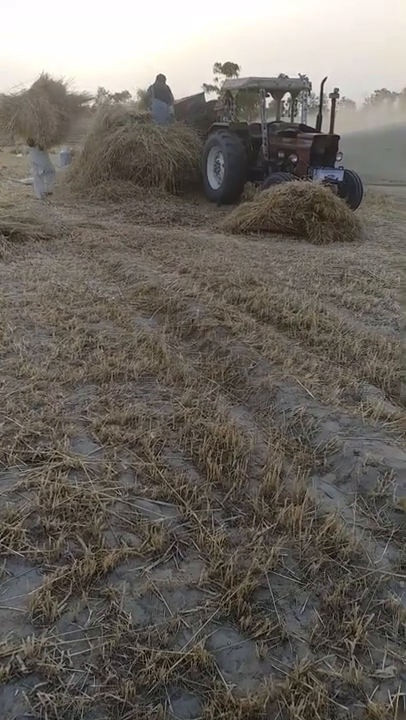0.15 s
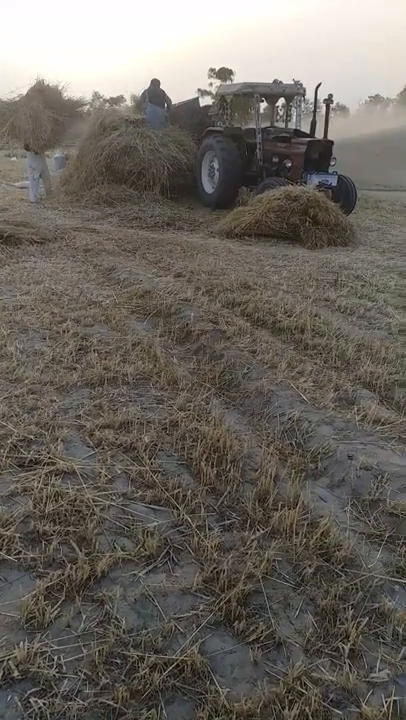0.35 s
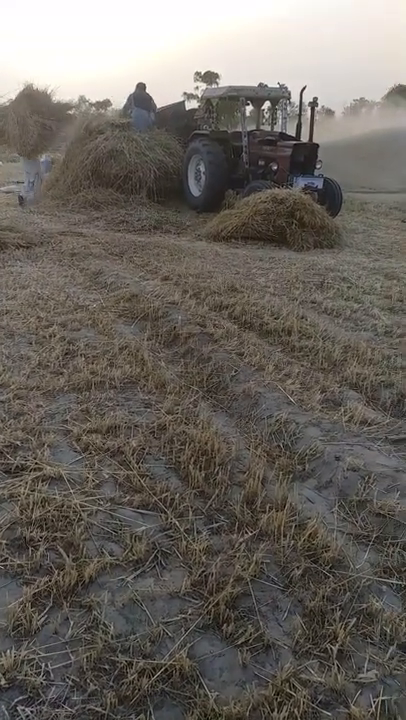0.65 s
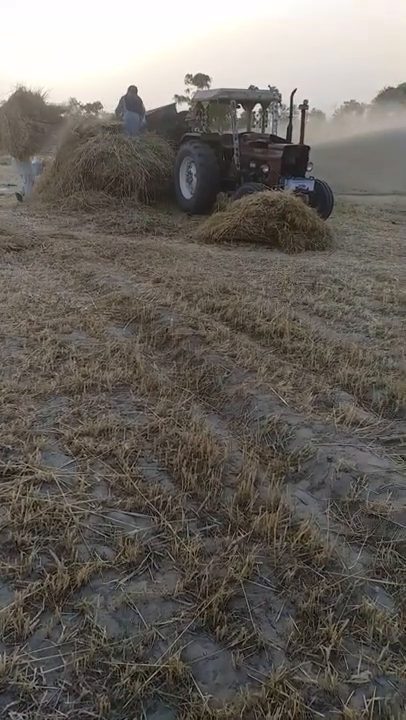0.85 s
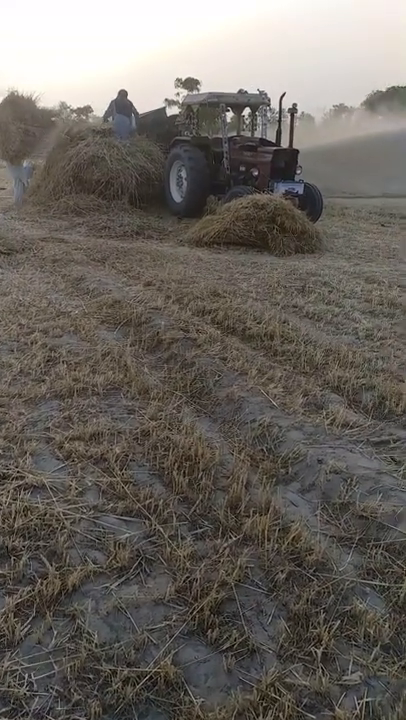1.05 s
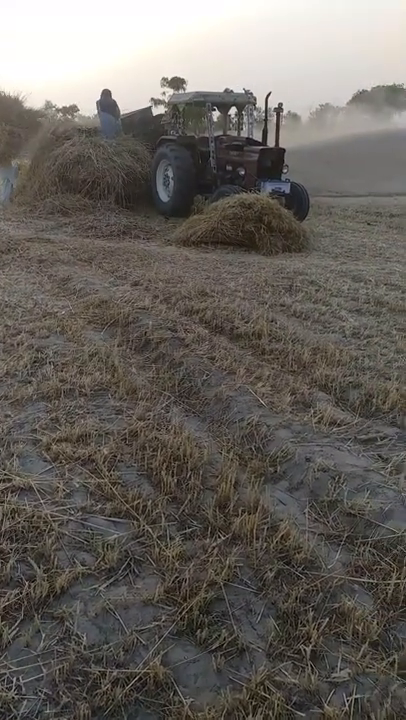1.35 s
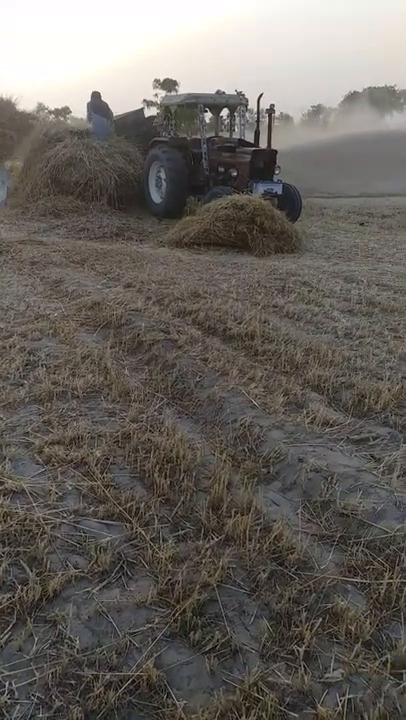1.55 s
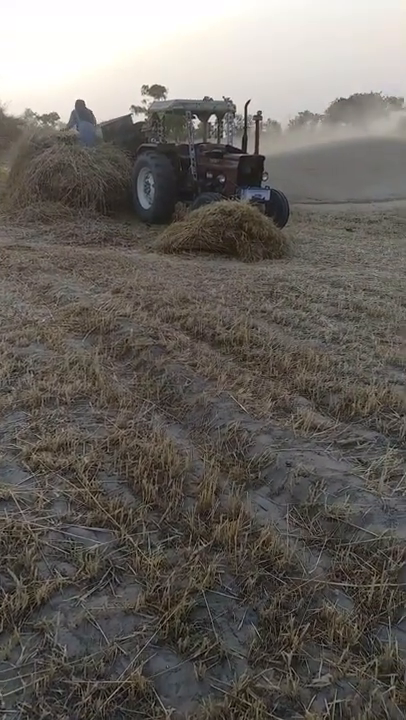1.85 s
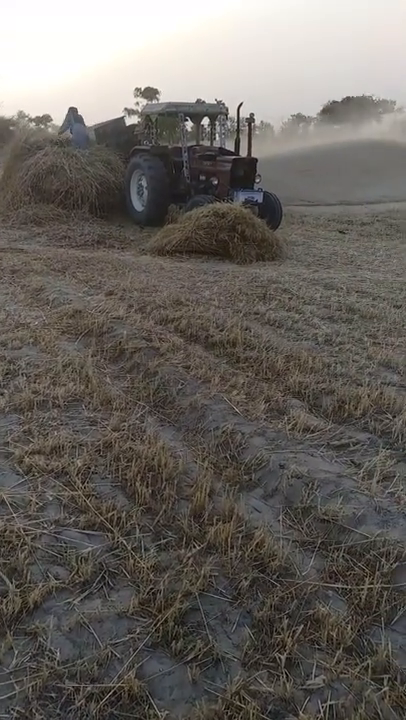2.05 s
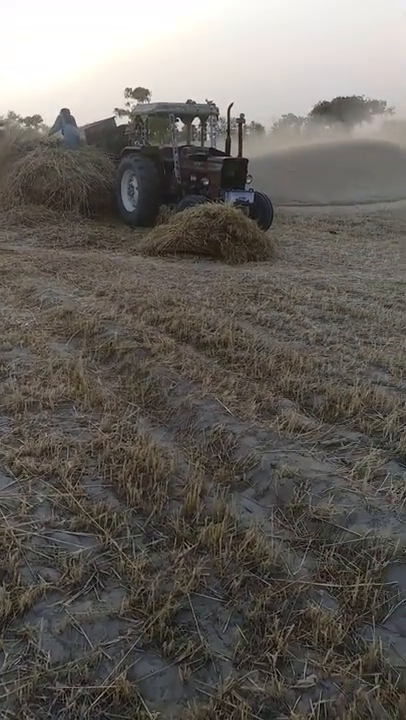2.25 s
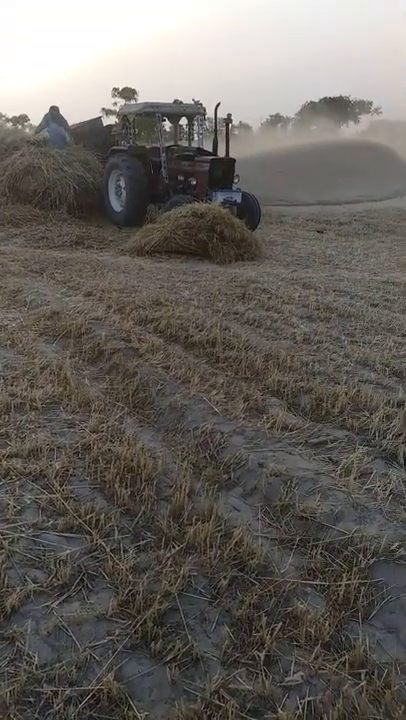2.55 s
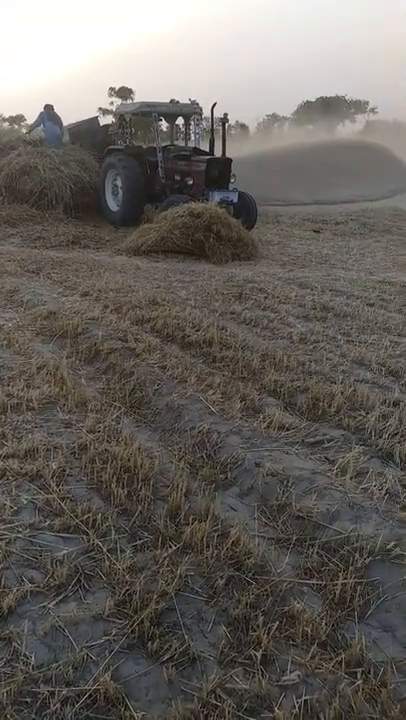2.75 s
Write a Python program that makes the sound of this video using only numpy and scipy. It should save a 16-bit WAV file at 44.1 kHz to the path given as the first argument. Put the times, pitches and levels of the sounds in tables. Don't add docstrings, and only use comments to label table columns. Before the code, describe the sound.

Continuous tractor engine drone and thresher roar, heard from some way off, sagging slightly under load

```python
import sys
import numpy as np
from scipy import signal
from scipy.fft import rfft, irfft
from scipy.io import wavfile
from scipy.ndimage import uniform_filter1d

SR = 44100
rng = np.random.default_rng(int(sys.argv[2]) if len(sys.argv) > 2 else 0)


def master_out(mix):
    frames = np.transpose(np.atleast_2d(mix))
    ceiling = np.clip(frames, -1, 1)
    pcm = np.round(ceiling * 32767).astype(np.int16)
    wavfile.write(sys.argv[1], SR, pcm)


def amplitude_ratio(level_db):
    exponent = np.asarray(level_db, float) / 20
    return 10 ** exponent


N = 128331

# time_s, firing_rate_hz
ENGINE_SPEED = [
    (0, 57.9),
    (.6, 57.9),
    (1.05, 57.7),
    (1.55, 57.35),
    (1.9, 56.95),
    (2.2, 56.05),
    (2.5, 55.8),
    (2.91, 55.75),
]
# time_s, straw_feed_db, diesel_knock_db
WORK_LOAD = [
    (0, -19.5, -4.5),
    (.4, -19.5, 0),
    (.9, -20, -1),
    (1.5, -20, -4.5),
    (1.75, -20.5, -2.5),
    (1.95, -22, -2.5),
    (2.3, -22.5, 3.5),
    (2.6, -21, 0),
    (2.91, -21, 0.5),
]
BLADE_RATIO = .6163


def evened(x):
    return x / np.sqrt(np.mean(x ** 2) + 1e-20)


def read(points, hz):
    f, value = np.transpose(points)
    return np.interp(np.log(hz + 1), np.log(f + 1), value)


def curve(table, column=1):
    rows = np.array(table)
    return np.interp(np.arange(N) / SR, rows[:, 0], rows[:, column])


def wander(hz):
    knots = uniform_filter1d(rng.standard_normal(200), size=2) * np.sqrt(2)
    return np.interp(np.arange(N) / SR * hz, np.arange(200), knots)


def ring(x, modes):
    out = np.zeros(N)
    for hz, width_hz, db in modes:
        radius = np.exp(-np.pi * width_hz / SR)
        angle = 2 * np.pi * hz / SR
        poles = [1, -2 * radius * np.cos(angle), radius * radius]
        out += amplitude_ratio(db) * (1 - radius * radius) / 2 * signal.lfilter([1, 0, -1], poles, x)
    return out


def noise(shape, db, patchy_db, flicker_db):
    frames = N // 256 + 5
    real, imaginary, patch = rng.standard_normal((frames, 513, 3)).T
    patch = uniform_filter1d(patch, size=8, axis=0)
    patch = evened(uniform_filter1d(patch, size=10, axis=1))
    flicker = flicker_db * rng.standard_normal(frames)
    spectra = (real + 1j * imaginary) * amplitude_ratio(patchy_db * patch + flicker)
    white = signal.istft(spectra, nperseg=1024, noverlap=768)[1][:N]
    hz = np.fft.rfftfreq(N, 1 / SR)
    inside = (hz > shape[0][0]) & (hz < shape[-1][0])
    return amplitude_ratio(db) * evened(irfft(rfft(white) * amplitude_ratio(read(shape, hz)) * inside, N))


def firings():
    strong_firing_s = 2.304
    turns = np.cumsum(curve(ENGINE_SPEED)) / SR
    return turns - turns[round(strong_firing_s * SR)] + 400


def sag_hz():
    rate_hz = curve(ENGINE_SPEED)
    return rate_hz.max() - rate_hz


def tones(turns, orders, dbs):
    out = np.zeros(N)
    for order, db in zip(orders, dbs):
        level = np.sqrt(2) * amplitude_ratio(db + 0.9 * wander(hz=3.14))
        out += level * np.sin(2 * np.pi * (order * turns + rng.random()))
    return out


def comb(turns, count, spread_db, shift_db):
    slow = turns[::4]
    wave = np.zeros(len(slow))
    for order in range(4, count):
        level = amplitude_ratio(spread_db * rng.standard_normal() + shift_db * wander(hz=3.5)[::4])
        wave += level * np.sin(2 * np.pi * (order * slow + rng.random()))
    return evened(signal.resample_poly(wave, 4, 1)[:N])


def feed(share):
    level_db = curve(WORK_LOAD)
    return amplitude_ratio(share * (level_db - level_db.mean()))


def blows():
    cylinder_db = [0, -5, -1, -5]
    spread_db, peak_s = 1.5, 0.0018
    turns = firings()
    which = turns.astype(int)
    chance = np.clip(rng.standard_normal(600), -2, 2)[which]
    size_db = np.array(cylinder_db)[which % 4] + spread_db * chance
    since = turns % 1 / curve(ENGINE_SPEED) / peak_s
    return evened(amplitude_ratio(size_db + curve(WORK_LOAD, column=2)) * since * np.exp(-since))


def exhaust():
    exhaust_orders = [1, 2, 2.5, 3, 4]
    exhaust_db = [-31.5, -25, -37, -34, -36]
    return tones(firings(), exhaust_orders, exhaust_db)


def gear_whine():
    fade_db_per_hz = 1.8
    return amplitude_ratio(-fade_db_per_hz * sag_hz()) * tones(firings(), [19.5], [-32])


def blower_hum():
    blower_orders = [4, 5, 6]
    blower_db = [-38, -30, -34]
    fade = amplitude_ratio(-3.5 * sag_hz() ** 2)
    return fade * tones(firings() * BLADE_RATIO, blower_orders, blower_db)


def knock(envelope):
    # pitch_hz, width_hz, level_db
    block_modes = [(1890, 190, 0), (2410, 120, 2), (3240, 99, -1), (3703, 190, 0), (4570, 100, -19.5)]
    ping_hz, ping_db, burst_db = 3760, -50.5, -49.5
    burst = evened(ring(ring(envelope * rng.standard_normal(N), block_modes), block_modes))
    sway_hz = ping_hz * (1 + 0.013 * wander(hz=39.84))
    ping = envelope ** 1.3 * np.sin(2 * np.pi * np.cumsum(sway_hz) / SR)
    return amplitude_ratio(burst_db) * burst + amplitude_ratio(ping_db) * evened(ring(ping, [(ping_hz, 500, 0)]))


def thresher():
    drum_orders = [4, 6, 7, 8, 9, 11, 12, 14, 16, 18, 20, 24]
    drum_db = [-38.5, -28.5, -44.5, -26, -40, -41.5, -27.5, -41.5, -30, -34.5, -43.5, -38]
    # pitch_hz, width_hz, level_db
    housing_modes = [(164.2, 9.7, -9), (281, 15, -9), (393, 17, -10.5), (429.6, 19, -11.5),
                     (521.3, 7.7, -7), (542.6, 25, -0.5), (599, 9.3, -2), (634.3, 8, -2), (849.1, 18.4, 0),
                     (878.4, 14.8, -2.5), (912, 15, -7), (1214, 20, -6), (1282, 27, -5.5)]
    drum_ratio, pulley_ratio, slow_blower_ratio = .1968, 2.226, .1849
    turns = firings()
    hum = tones(turns * drum_ratio, drum_orders, drum_db) + tones(turns, [pulley_ratio], [-28])
    blades = comb(turns * BLADE_RATIO, count=40, spread_db=1.96, shift_db=-1.8)
    slow_blower = comb(turns * slow_blower_ratio, count=64, spread_db=-0.5, shift_db=1.0)
    rattle = rng.standard_normal(N)
    rung = np.zeros(N)
    for shaking, db in [(blades, -28), (slow_blower, -28), (rattle, -23.5)]:
        rung += amplitude_ratio(db) * evened(ring(ring(shaking, housing_modes), housing_modes))
    return hum + feed(1.0) * rung


def straw(envelope):
    # pitch_hz, level_db
    rumble_shape = [(3, -36), (42, -16.5), (100, -6), (150, 0.5), (230, -1), (320, -5), (480, -5),
                    (600, -24)]
    # pitch_hz, level_db
    roar_shape = [(380, -15), (480, -33.5), (530, 4), (900, -3), (1020, -7), (1450, -2.5), (1600, -14.5),
                  (2000, -33)]
    # pitch_hz, level_db
    hiss_shape = [(880, -38), (1500, -5), (1710, -7), (1940, 1.5), (2260, -6.5), (2670, -7), (4760, -18.5),
                  (6660, -29), (8600, -49), (11200, -89), (18900, -120)]
    # pitch_hz, width_hz, level_db
    guard_modes = [(1966, 465, 7), (2660, 346, 9), (3183, 250, 10), (3880, 690, 4.5), (4694, 390, 8),
                   (5310, 300, 8.5), (5940, 230, 10.5), (6510, 350, 6.5)]
    rumble = noise(rumble_shape, -26.5, patchy_db=0.4, flicker_db=0.24)
    roar = noise(roar_shape, -21, patchy_db=1.2, flicker_db=0.48)
    puffs = 1 + 0.24 * uniform_filter1d(envelope, size=100)
    hiss = noise(hiss_shape, 0, patchy_db=1.25, flicker_db=0.61) * puffs
    hiss = amplitude_ratio(-29.5) * evened(hiss + ring(hiss, guard_modes))
    return feed(0.42) * rumble + feed(0.3) * roar + feed(0.33) * hiss


def air():
    # pitch_hz, level_db
    air_shape = [(4710, -52), (8000, -42), (8440, -27), (9920, -14), (11400, -2.5), (12100, 1.5),
                 (15100, -1.5), (15800, 4)]
    return noise(air_shape, -51, patchy_db=1.3, flicker_db=0.81)


def ticks():
    # start_s, peak_db, ring_hz
    snaps = [
        (1.2535, -37.5, 11800),
        (1.7898, -47, 12140),
        (1.832, -35.5, 12260),
        (2.21, -35, 12800),
        (2.2598, -33, 12900),
    ]
    out, t = np.zeros(N + 900), np.arange(900) / SR
    shape = np.minimum(t / .0005, 1) * np.exp(-t / .0012)
    bright = signal.butter(2, [10500, 15500], "band", fs=SR)
    for start_s, db, hz in snaps:
        puff = signal.lfilter(*bright, rng.standard_normal(900)) * 1.6
        out[round(start_s * SR):][:900] += amplitude_ratio(db) * shape * (np.sin(2 * np.pi * hz * t) + puff)
    return out[:N]


def scene():
    envelope = blows()
    engine = exhaust() + gear_whine() + blower_hum() + knock(envelope)
    mono = engine + thresher() + straw(envelope) + air() + ticks()
    return np.array([mono, mono])


def roll_off(x):
    return signal.sosfilt(signal.butter(12, 15910, fs=SR, output="sos"), x)


def record(dry):
    # pitch_hz, left_minus_right_db
    port_lean = [(300, -0.04), (700, 0.2), (1290, .5), (2380, 1.4), (3500, 1.95), (5000, -0.4),
                 (8000, 2.24), (15000, -0.8)]
    edge_hz = 15730
    wide = np.pad(dry, [(0, 0), (2048, 2048)], mode="reflect", reflect_type="odd")
    hz = np.fft.rfftfreq(wide.shape[1], 1 / SR)
    lean_db = read(port_lean, hz) / 2
    gain = amplitude_ratio(np.array([lean_db, -lean_db])) * (hz < edge_hz)
    ports = irfft(rfft(wide) * gain, wide.shape[1])
    return roll_off(ports[:, 2048:-2048])


dry = scene()
out = record(dry)
master_out(out)
```